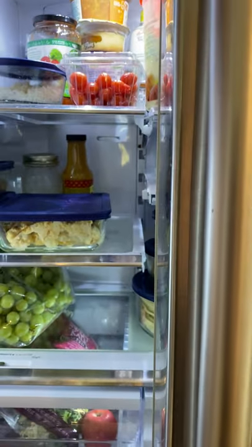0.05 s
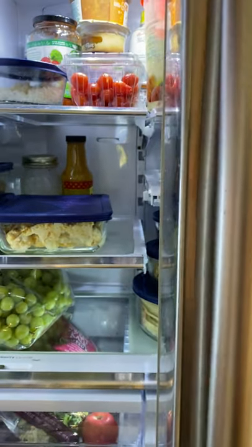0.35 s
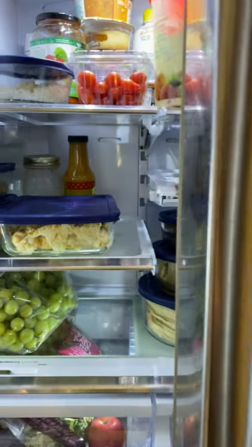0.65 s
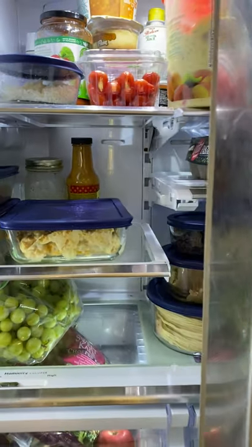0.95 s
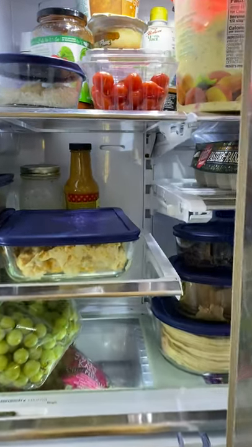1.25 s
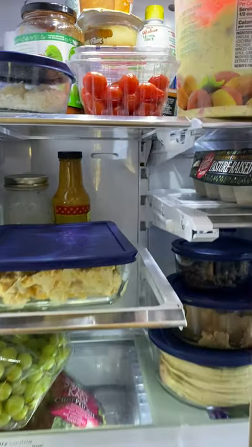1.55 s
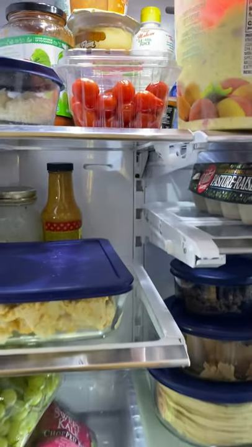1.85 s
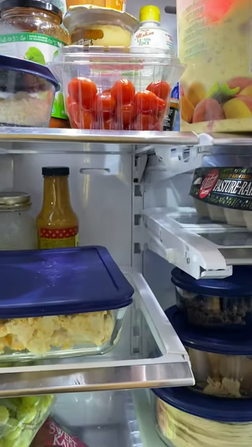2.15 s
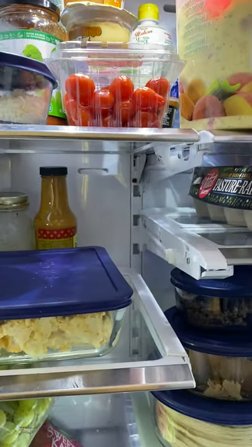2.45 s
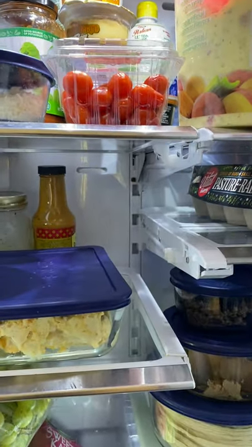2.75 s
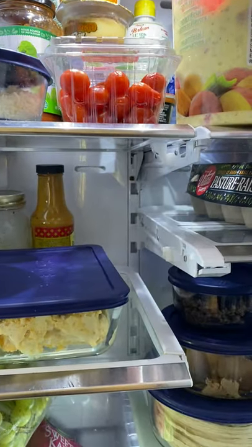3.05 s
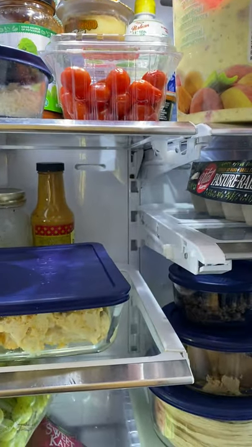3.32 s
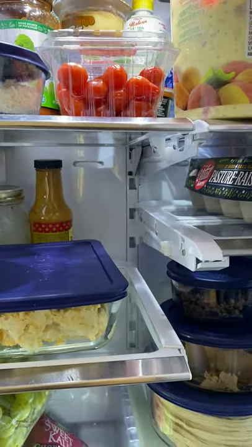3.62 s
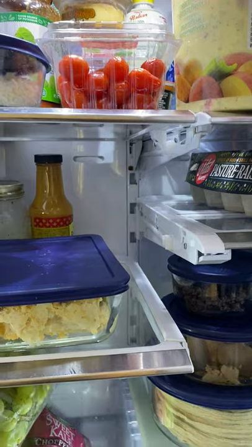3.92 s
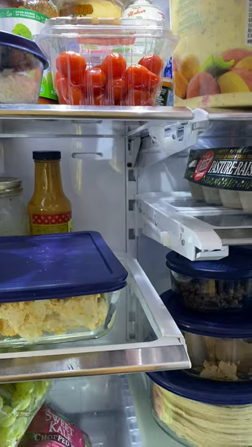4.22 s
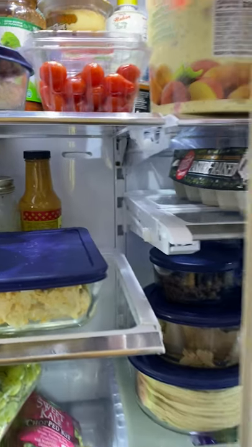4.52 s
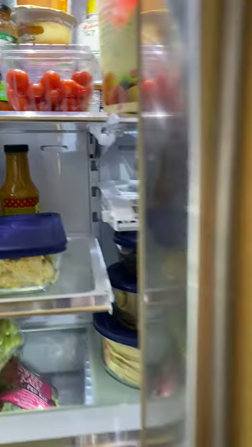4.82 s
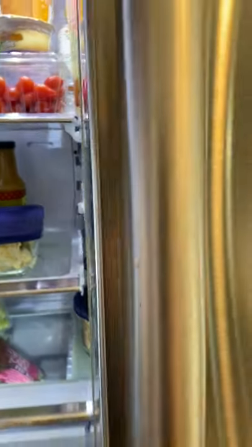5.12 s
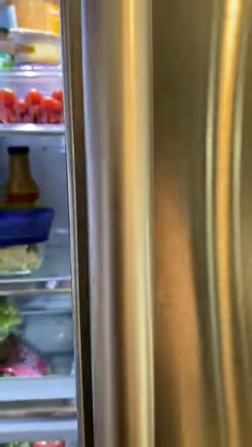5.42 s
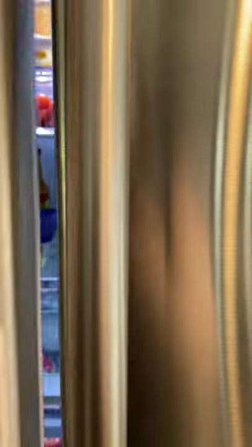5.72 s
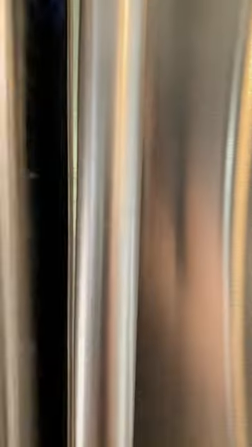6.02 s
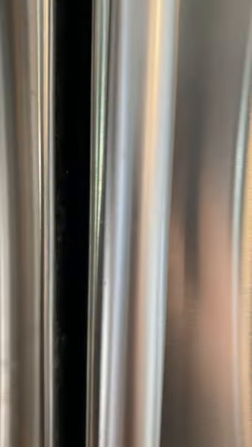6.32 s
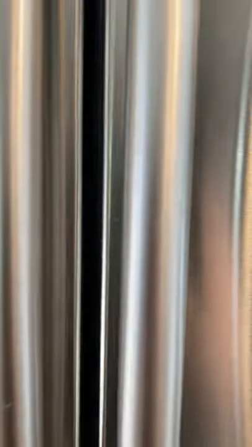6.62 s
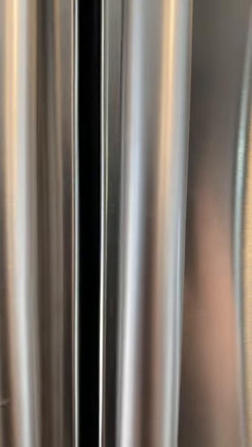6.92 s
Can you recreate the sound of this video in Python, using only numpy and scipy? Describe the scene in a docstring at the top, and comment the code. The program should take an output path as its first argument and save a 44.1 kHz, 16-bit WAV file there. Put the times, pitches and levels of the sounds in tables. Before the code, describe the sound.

A refrigerator door creaks open ever more slowly over a low hum, then knocks, rattles and shuts with a heavy thump.

```python
"""A refrigerator door swings open on a dry hinge that sticks and slips, ever slower, until it stops.
All along, the compressor and fans hum out of the open cabinet. A sleeve rustles and faint whirs come
and go. After about 4.4 seconds the door is pushed back with soft bumps and knocks. Near 6 seconds its
flap clacks into the guide and jars rattle. At 6.6 seconds it lands on the gasket (the rubber seal)
with a thump that shakes the shelves."""
import sys
import numpy as np
from scipy import signal
from scipy.fft import rfft, irfft, next_fast_len
from scipy.io import wavfile

SR = 44100
rng = np.random.default_rng(int(sys.argv[2]) if len(sys.argv) > 2 else 0)


def pcm_store(signal):
    """Save signal as 16-bit PCM."""
    levels = np.round(np.clip(np.atleast_2d(signal), -1, 1) * 32767)
    wavfile.write(sys.argv[1], SR, levels.astype(np.int16).T)


N = 311346
TIME = np.arange(N) / SR


def from_db(db):
    """Turn decibels into a gain."""
    return 10 ** (np.asarray(db) / 20)


def rms_one(x):
    """Scale a signal to an average (rms) size of 1."""
    return x / np.sqrt(np.mean(x ** 2) + 1e-20)


def read(curve, times):
    """A curve's values at the given times."""
    return np.interp(times, *np.transpose(curve))


def at_hz(points, hz):
    """A table's value at a pitch, with every octave equally wide."""
    f, value = np.transpose(points)
    return np.interp(np.log(hz), np.log(f), value)


def follow(law, control):
    """A level in dB that changes in a straight line with a control."""
    base_db, slope_db = law
    return base_db + slope_db * control


def pan(db):
    """Left and right gains, with the left louder by db."""
    return from_db(np.array([[db], [-db]]) / 2)


def drift(rate):
    """A random wobble of size about 1 that takes `rate` new values a second."""
    knots = rng.standard_normal(8000)
    return np.interp(TIME * rate, np.arange(len(knots)), knots)


def strikes(times, levels_db):
    """One click of the given level at each time."""
    out = np.zeros(N)
    out[np.round(np.asarray(times) * SR).astype(int)] = from_db(levels_db)
    return out


def dull(x, edge_hz, order):
    """Turn down the treble above an edge."""
    return signal.sosfilt(signal.butter(order, edge_hz, fs=SR, output="sos"), x)


def through(x, response):
    """Give every sample of x the ring of a stereo response."""
    return signal.fftconvolve(np.atleast_2d(x), response, axes=1)[:, :N]


def reflections(x, wet_db, t60):
    """Add dense echoes. Here and below, t60 is the fade time: the seconds it takes to fall by 60 dB."""
    t = TIME[:SR // 2]
    echoes = rng.standard_normal((2, len(t))) * from_db(-60 * t / t60)
    return x + from_db(wet_db) * through(x, echoes / np.sqrt(np.sum(echoes[0] ** 2)))


# Where each pitch sits. Each row: pitch in Hz, dB by which left is louder than right.
LEAN = [(60, -0.5), (200, -3), (550, -5.5), (950, 5.5), (1300, 1.5), (2300, -0.5)]
def ring(x, modes, swell_s):
    """A struck object rings with its own tones (modes), which build up and then fade."""
    t = TIME[:SR]
    tones = sum(pan(at_hz(LEAN, hz)) * from_db(db - 60 * t / t60) * np.sin(2 * np.pi * hz * t)
                for hz, db, t60 in modes)
    return through(x, tones * (1 - np.exp(-t / swell_s)))


# How wide each pitch sounds. Each row: pitch in Hz, dB of the side signal over the middle one.
WIDTH = [(60, -40), (200, -19), (370, -4), (670, -1.5), (1230, -6.5), (2260, -4.5), (5000, 4.5),
         (10000, -12.5)]
def noise(spectrum, size=N, t60=None, patchy_db=None):
    """Stereo noise that starts at size 1; each half-octave band may waver or fade at its own rate."""
    steady, out = 0, 0
    edges = 27 * 2 ** np.arange(0, 9.6, .5)
    white = rng.standard_normal((2, 2, size + 4000))
    for k, (low, high) in enumerate(zip(edges, edges[1:])):
        hz = np.sqrt(low * high)
        band_filter = signal.butter(2, [low, high], "band", fs=SR, output="sos")
        mid, side = signal.sosfilt(band_filter, white[k % 2])[:, -size:]
        band = (mid + from_db(at_hz(WIDTH, hz)) * side * [[1], [-1]]) * pan(at_hz(LEAN, hz))
        band = rms_one(band) * np.sqrt(high - low) * from_db(at_hz(spectrum, hz))
        if patchy_db is not None:
            band = band * from_db(patchy_db * drift(12))
        steady = steady + band
        out = out + (band if t60 is None else band * from_db(-60 * TIME[:size] / at_hz(t60, hz)))
    return out / np.sqrt(np.mean(steady ** 2))


# The door coasting to a stop. Each row: time in seconds, hinge slips per second.
SWING_SPEED = [(0, 18.45), (.3, 16.94), (.45, 15.36), (.65, 14.36), (1.2, 11.1), (1.8, 8.09), (2.5, 5.05),
               (3.25, 2.05)]
MID_SPEED = 10   # slips per second
# The grip: the force that a slip lets go. Each row: time in seconds, level in dB.
GRIP = [(0, -41.5), (.33, -40), (.6, -37.5), (1.3, -36), (1.6, -34.5), (2.05, -29.5), (2.3, -36.5),
        (2.9, -38), (3.25, -40)]
def hinge(first_slip_s=.0377):
    """The dry hinge slips each time the door turns one more equal step; every slip shakes the door."""
    t = TIME[TIME < SWING_SPEED[-1][0]]
    steps = np.cumsum(read(SWING_SPEED, t)) / SR
    steps -= np.interp(first_slip_s, t, steps)
    times = np.interp(np.arange(int(steps[-1]) + 1), steps, t)
    slips = times, read(SWING_SPEED, times), read(GRIP, times)
    return pin_rasp(*slips) + shudder(*slips) + bracket(*slips) + panel_and_shelf(*slips)


def slip_noise(times, levels_db, creep_share, creep_db, fall_s):
    """Friction creeps before each slip, longer when the door is slow, then lets go in a short burst."""
    envelope = np.zeros(N)
    for at, db, period in zip(times, levels_db, np.gradient(times)):
        creep_s = creep_share * period
        span = slice(max(int((at - creep_s) * SR), 0), int((at + 10 * fall_s) * SR))
        t = TIME[span] - at
        burst = np.exp(-np.maximum(t, 0) / fall_s)
        envelope[span] += from_db(db) * np.where(t < 0, from_db(creep_db), burst)
    return envelope * rng.standard_normal((2, N))


def resonate(x, peaks, uneven_db=1):
    """The pin's resonances colour the noise; each answers unevenly, and some grow with the speed."""
    out, power = 0, 0
    faster = read(SWING_SPEED, TIME) - MID_SPEED
    for k, (hz, width_hz, db, *speed_db) in enumerate(peaks):
        drive = x * from_db(sum(speed_db) * faster + uneven_db * drift(12))
        r = np.exp(-np.pi * width_hz / SR)   # share of the ring left after one sample
        feedback = [1, -2 * r * np.cos(2 * np.pi * hz / SR), r * r]
        mid, side = signal.lfilter(np.array([1, 0, -1]) * (1 - r * r) / 2, feedback, drive + 1e-18)
        spread = from_db(at_hz(WIDTH, hz))
        stereo = (mid + spread * side * [[1], [-1]]) / np.hypot(1, spread)
        out = out + (-1) ** k * from_db(db) * stereo
        power += from_db(db) ** 2 * np.pi * width_hz / SR
    return out / np.sqrt(power)


# The pin's groan and rub. Each row: pitch in Hz, width in Hz, relative level in dB.
PIN_GROAN = [(583, 876, 4.5), (1071, 640, 3.5)]
PIN_RUB = [(1380, 100, -9), (1770, 120, 1), (1950, 90, 0), (2150, 110, -5), (3050, 600, -7)]
# Its bright snap. Each row: the same three, then dB added per slip per second above MID_SPEED.
PIN_SNAP = [(5075, 520, 1, 0.5), (5720, 650, -5.5, 0.68), (6320, 380, -3.5, 1), (7240, 154, 2, 0.1),
            (7890, 150, 4, 0.38), (10300, 2200, -15, 0)]
# Each speed law: dB over the grip at rest, dB added per slip per second.
GROAN_LAW = (-8.5, 0.3)
RUB_LAW = (-21.5, 1)
# How strong the snap is. Each row: time in seconds, level in dB.
SNAP_DB = [(0, -40), (.55, -40), (1.2, -48), (1.8, -39), (2.3, -49.5), (3.25, -55)]
def pin_rasp(times, speed, grip_db, uneven_db=-1.86):
    """Each slip sounds in the hinge pin with a bright snap; a slow door groans, a fast one rubs more."""
    snap_db = read(SNAP_DB, times) + uneven_db * rng.standard_normal(len(times))
    groan_db = grip_db + follow(GROAN_LAW, speed)
    rub_db = grip_db + follow(RUB_LAW, speed)
    groan = resonate(slip_noise(times, groan_db, creep_share=.073, creep_db=-3, fall_s=.024), PIN_GROAN)
    rub = resonate(slip_noise(times, rub_db, creep_share=.08, creep_db=-10, fall_s=.0099), PIN_RUB)
    snap = resonate(slip_noise(times, snap_db, creep_share=.092, creep_db=-19, fall_s=.0027), PIN_SNAP)
    low = dull(groan + rub, edge_hz=4200, order=2)
    high = dull(snap, edge_hz=11500, order=2)
    in_kitchen = reflections(low, wet_db=-15.5, t60=0.88)
    in_hollow_door = reflections(high, wet_db=-4.0, t60=0.08)
    return in_kitchen + in_hollow_door


# The door's shuddering tones. Each row: pitch in Hz, relative level in dB, fade time in seconds.
SHUDDER_MODES = [(253, 2.5, 0.073), (203.3, -2.5, 0.15), (279.4, -6, 0.053)]
# Their speed law: dB over the grip at rest, dB added per slip per second.
SHUDDER_LAW = (3.83, -0.32)
def shudder(times, speeds, grip_db, lead_share=0.036, hold_s=0.0059, hold_share=0.053, swell_s=0.008):
    """The door shakes roughly while a slip lasts, longer when it is slow, and then rings out."""
    out, t = np.zeros(N), TIME[:SR // 4]
    levels_db = grip_db + follow(SHUDDER_LAW, speeds)
    for hz, mode_db, t60 in SHUDDER_MODES:
        chances = rng.uniform(-1.38, 1, (len(times), 2))
        for at, speed, db, (detune, phase) in zip(times, speeds, levels_db, chances):
            lead_s = lead_share / speed
            since_release = np.maximum(t - lead_s - hold_s - hold_share / speed, 0)
            swell = 1 - np.exp(-t / (swell_s * MID_SPEED / speed))
            fade = from_db(db + mode_db - 60 * since_release / t60)
            tone = np.sin(2 * np.pi * hz * (1 + .025 * detune) * (t - lead_s) + phase)
            start = max(round((at - lead_s) * SR), 0)
            out[start:start + len(t)] += swell * fade * tone
    return out * from_db(1.5 * drift(110)) * pan(at_hz(LEAN, SHUDDER_MODES[0][0]))


# The hinge bracket's woody tones. Each row: pitch in Hz, relative level in dB, fade time in seconds.
BRACKET_MODES = [(1143, -14.5, 0.064), (1763, -13, 0.041), (1972, -22.5, 0.081)]
def bracket(times, speed, grip_db, uneven_db=2, let_go_s=0.0036, let_go_share=0.04):
    """Each slip knocks the bracket twice, and each tone answers with a strength of its own."""
    let_go = times - let_go_s - let_go_share / speed   # earlier when the door is slow
    out = 0
    for mode in BRACKET_MODES:
        jolt_db = grip_db + uneven_db * rng.standard_normal(len(times))
        jolts = strikes(let_go, jolt_db - 4.5) + strikes(times, jolt_db)
        out = out + ring(jolts, [mode], swell_s=0.00033)
    return out


# Tones of the door panel and a shelf. Each row: pitch in Hz, relative level in dB, fade time in seconds.
PANEL_MODES = [(189.9, 2.5, 0.21), (388, -12.5, 0.15), (550.3, -11, 0.17)]
SHELF_MODES = [(952.7, 1.5, 0.13)]
# The panel's speed law: dB over the grip at rest, dB added per slip per second.
PANEL_LAW = (-18, 1.444)
# How hard the shelf is shaken. Each row: time in seconds, relative level in dB.
SHELF_DB = [(0, -48.5), (.26, -42.5), (.39, -51.5), (.6, -51.5), (.79, -42), (.93, -51.5), (1.4, -40.5),
            (1.8, -46), (1.97, -52), (3.25, -58)]
def panel_and_shelf(times, speed, grip_db):
    """The panel and a shelf ring on after each slip; a fast door shakes its panel more."""
    under_way = strikes([0], [-35.5])   # the door is already creaking at the start
    panel_jolts = under_way + strikes(times, grip_db + follow(PANEL_LAW, speed))
    shelf_jolts = under_way / 2 + strikes(times + 0.00249, read(SHELF_DB, times) + 8.5)
    return ring(panel_jolts, PANEL_MODES, swell_s=.0023) + ring(shelf_jolts, SHELF_MODES, swell_s=.0076)


# Tones of the compressor and fans. Each row: pitch in Hz, base level in dB.
HUM = [(49.3, -53), (64.3, -57), (98.6, -55.5), (136.3, -63.5)]
# How much of the hum gets out. Each row: time in seconds, dB added.
OPENING = [(0, -5.5), (1.8, 3.5), (4.4, 1), (5.1, -3.5), (7.06, -5)]
# The colour of the rushing air. Each row: pitch in Hz, relative level in dB.
AIR = [(30, -28.5), (59, -14), (250, -17), (600, -33.5), (1100, -36.5), (3200, -50.5), (6300, -53.5),
       (14300, -69)]
def compressor_and_fans(waver_rad=0.08, air_db=-60):
    """Compressor and fans beat against each other over a soft rush of air."""
    hum = 0
    for hz, db in HUM:
        phase = 2 * np.pi * (hz * TIME + rng.random()) + waver_rad * drift(20)
        hum = hum + from_db(db) * np.sqrt(2) * np.sin(phase)
    return hum * from_db(read(OPENING, TIME)) * pan(-1.1) + from_db(air_db) * noise(AIR)


def blow(spectrum, rise_s, t60, tail_db, tail_t60):
    """One hit: the contact builds up, rings densely and briefly, and leaves a weak tail in the kitchen."""
    t = TIME[:SR // 2]
    contact = (1 - np.exp(-t / rise_s)) ** 2
    fade = from_db(-60 * t / t60) + from_db(tail_db - 60 * t / tail_t60)
    return noise(spectrum, size=len(t)) * contact * fade


# Knocks of the door, its flap and its load. Each row: start in seconds, thud strength in dB,
# hardness from 0 to 1, pitch of the hollow tone in Hz, that tone's dB over the thud strength.
KNOCKS = [(0.621, -46, 0.1, 358, 8.5), (4.45, -41.5, 0.43, 1650, 0), (4.457, -50, 0.4, 308, 18),
          (4.802, -45, 0, 549, 5.5), (4.937, -49, 0.49, 390, 6.5), (5.62, -38.5, 0.61, 382, 3.5),
          (5.914, -53, 0.26, 414, 10.5), (6.0716, -44.5, 0.9, 1780, 24.5), (6.104, -48, 0.1, 189, 17.5),
          (6.1444, -38.5, 0.78, 2080, 18.5), (6.231, -32.5, 0.37, 414, -5), (6.247, -37.5, 0.1, 125.3, 6.5),
          (6.559, -54.5, 0.95, 2460, 20), (6.5972, -32.5, 0.87, 3400, 12)]
# The colours of a knock's three parts. Each row: pitch in Hz, relative level in dB.
THUD = [(50, -9.5), (280, -5.5), (500, -10), (900, -40.5), (5000, -100)]
CLACK = [(150, -3), (600, 7.5), (1100, -4.5), (1800, 4.5), (2800, -28.5), (14000, -77.5)]
CLICK = [(1000, -48.5), (2200, -0.5), (5000, 1.5), (12000, -23), (16000, -40)]
# Each hardness law: dB over the thud when soft, dB added when fully hard.
CLACK_LAW = (-21, 39.9)
CLICK_LAW = (-69.5, 94)
def knocks(hollow_cycles=36):
    """Plastic parts meet with a thud and a hollow tone; a harder contact adds more clack and click."""
    times, thud_db, hardness, *_ = np.transpose(KNOCKS)
    thuds = strikes(times, thud_db)
    clicks = strikes(times, thud_db + follow(CLICK_LAW, hardness))
    clacks = strikes(times, thud_db + follow(CLACK_LAW, hardness))
    out = through(thuds, blow(THUD, rise_s=0.0018, t60=0.13, tail_db=-11.0, tail_t60=0.41))
    out += through(clicks, blow(CLICK, rise_s=.0001, t60=0.037, tail_db=-19.5, tail_t60=0.33))
    out += through(clacks, blow(CLACK, rise_s=0.00059, t60=0.055, tail_db=-24.5, tail_t60=1.0))
    for at, db, _, hz, hollow_db in KNOCKS:
        cycles, start = hz * TIME[:SR // 5], round(at * SR)
        envelope = (1 - np.exp(-cycles / 2)) * from_db(db + hollow_db - 60 * cycles / hollow_cycles)
        out[:, start:start + len(cycles)] += envelope * np.sin(2 * np.pi * cycles)
    return out


# Strokes of the sleeve. Each row: loudest moment in seconds, level in dB, swell and fade in seconds.
SWISHES = [(1.05, -68, .5, 0.14), (4.88, -65, 0.098, 0.079), (1.46, -64, 0.045, 0.045),
           (5.025, -56, 0.012, 0.05), (5.335, -52, 0.093, 0.076), (6.11, -58, 0.14, 0.033),
           (6.57, -53.5, 0.099, 0.056)]
# The colour of the cloth. Each row: pitch in Hz, relative level in dB.
SLEEVE = [(600, -43), (1200, -14), (2600, -1), (6000, -3.5), (12000, -6.5)]
def sleeve(patchy_db=4.5, grit_db=2.0):
    """Cloth swells and fades with each move of the arm, gritty and shifting in colour."""
    strokes = sum(from_db(db) * np.exp(-np.maximum((at - TIME) / swell_s, (TIME - at) / fade_s))
                  for at, db, swell_s, fade_s in SWISHES)
    cloth = noise(SLEEVE, patchy_db=patchy_db) * from_db(grit_db * drift(620))
    return dull(cloth, edge_hz=12500, order=10) * strokes


# Faint whirs and scrapes. Each row: middle and length in seconds, pitch in Hz, level in dB,
# half width in Hz.
WHIRS = [(2.518, 1.7, 3940, -83, 151), (3.015, 0.3, 1450, -76, 49.4), (3.58, 0.3, 1950, -76.5, 398),
         (4.07, 0.36, 1090, -72.5, 188), (4.437, 0.17, 1070, -68, 235), (5.782, 0.66, 4800, -71, 980)]
def whirs(waver_db=4.0):
    """Narrow bands of noise swell, waver and fade."""
    out = 0
    for middle, length, hz, db, half_width in WHIRS:
        swell = np.cos(np.pi * np.clip((TIME - middle) / length, -.5, .5))
        level = from_db(db + waver_db * drift(25))
        band = signal.butter(2, [hz - half_width, hz + half_width], "band", fs=SR, output="sos")
        out = out + level * swell * rms_one(signal.sosfilt(band, rng.standard_normal((2, N))))
    return out


# Soft pushes on the door. Each row: start in seconds, strength in dB.
BUMPS = [(4.431, -41), (4.453, -39), (4.8, -43.5)]
# The whole door's deep tones. Each row: pitch in Hz, relative level in dB, fade time in seconds.
BUMP_MODES = [(59.4, 7.5, 0.26), (113, 0, 0.12)]
def bumps():
    """A push sets the whole door thudding softly."""
    return ring(strikes(*np.transpose(BUMPS)), BUMP_MODES, swell_s=0.0019)


# Light plastic ticks. Each row: start in seconds, strength in dB.
TICKS = [(4.733, -55.5), (5.989, -51.5), (6.133, -44), (6.234, -49.5), (6.432, -53), (6.767, -41.5)]
# Their colour. Each row: pitch in Hz, relative level in dB.
TICK_COLOUR = [(1000, -35.5), (2200, 4), (9000, -9)]
def ticks():
    """A light touch of plastic makes only a thin click."""
    tick = blow(TICK_COLOUR, rise_s=0.00013, t60=0.049, tail_db=-13.5, tail_t60=0.2)
    return through(strikes(*np.transpose(TICKS)), tick)


# Flap and gasket sliding home. Each row: time in seconds, level in dB.
SLIDE_DB = [(6.05, -110), (6.1, -41.5), (6.28, -42), (6.49, -51), (6.59, -29.5), (6.7, -89)]
# The colour of the scrape. Each row: pitch in Hz, relative level in dB.
SLIDE = [(30, -7), (160, -12.5), (350, -25), (1500, -31), (4800, -51.5), (13000, -56)]
def gasket_slide(grit_db=3):
    """Flap and gasket scrape unevenly along the frame."""
    return noise(SLIDE) * from_db(read(SLIDE_DB, TIME)) * from_db(grit_db * drift(120))


# Jars and packets touching. Each row: start in seconds, level in dB.
RATTLES = [(6.082, -33), (6.146, -27.5), (6.232, -37), (6.277, -35.5), (6.365, -42.5), (6.473, -42.5),
           (6.521, -44), (6.668, -23.5), (6.714, -32.5)]
def rattles(centre_hz=1300, t60=0.04, spread_octaves=0.7, count=9):
    """Jars and packets jostle in the door bins: each touch rings its own short cluster of tones."""
    out, t = np.zeros((2, N)), TIME[:SR // 8]
    for at, db in RATTLES:
        offsets = np.linspace(-1, 1, count) + rng.uniform(-0.72, 1, count) / count
        pitches = centre_hz * 2 ** (spread_octaves * offsets)
        tones = sum(pan(at_hz(LEAN, hz)) * np.sin(2 * np.pi * (hz * t + rng.random())) for hz in pitches)
        envelope = from_db(db - 60 * t / t60) * (1 - np.exp(-centre_hz * t))
        start = round(at * SR)
        out[:, start:start + len(t)] += envelope * tones / np.sqrt(count)
    return out


# Colours of the latch meeting the frame, and of shelves and walls shaking.
# Each row: pitch in Hz, relative level in dB.
CRACK = [(500, -17), (1000, 8), (1600, -8.5), (3300, -2.5), (5500, -15.5), (9000, 2), (14500, -10.5)]
SHAKE = [(40, -22), (100, -2.5), (400, -7), (1000, -11), (2800, -26), (6200, -32.5), (10000, -31),
         (16000, -50)]
# How long the shaking lasts. Each row: pitch in Hz, fade time in seconds.
SHAKE_T60 = [(100, 0.89), (1000, 0.54), (6000, 0.68), (12000, 0.23)]
# Tones of the jars and the cabinet. Each row: pitch in Hz, relative level in dB, fade time in seconds.
JAR_MODES = [(148.8, 8.9, 0.75), (248, 10, 0.45), (337, 10.5, 0.4), (450, 6.9, 0.45), (553, 4.1, 0.37),
             (842, 9, 0.43), (1028, 4.9, 0.31), (1238, 10, 0.26), (1480, 7, 0.29)]
CABINET_MODES = [(35.64, -9, 0.56), (75, -0.5, 0.16), (89, -2, 0.11), (162, -6, 0.051)]
def slam(land_s=6.6002, boom_s=6.6125, waver_db=3.5):
    """The door lands with a crack: shelves shake, jars ring, the cabinet booms as the gasket squeezes."""
    latch = blow(CRACK, rise_s=.0001, t60=0.013, tail_db=-19.5, tail_t60=0.095)
    crack = through(strikes([land_s], [-5]), latch)
    shake = through(strikes([land_s], [-22.5]), noise(SHAKE, size=SR, t60=SHAKE_T60))
    shake = dull(shake * from_db(waver_db * drift(60)), edge_hz=10800, order=8)
    jars = ring(strikes([land_s], [-36]), JAR_MODES, swell_s=0.0034)
    boom = ring(strikes([boom_s], [-8]), CABINET_MODES, swell_s=0.00052)
    return crack + shake + jars + boom


def scene():
    """Everything heard from just in front of the cabinet."""
    door = hinge() + knocks() + bumps() + ticks() + rattles() + slam()
    rubbing = sleeve() + gasket_slide()
    return door + rubbing + compressor_and_fans() + whirs()


def record(dry, right_lag_s=3.6e-5, cutoff_hz=14200):
    """Two microphones, slightly apart, drop the deepest bass, round the peaks and cut the top."""
    size = next_fast_len(N + SR)
    hz = np.arange(size // 2 + 1) * SR / size
    delay = np.exp(-2j * np.pi * hz * right_lag_s)
    right = irfft(rfft(dry[1], size) * delay, size)[:N]
    trimmed = signal.sosfilt(signal.butter(2, 28, "high", fs=SR, output="sos"), [dry[0], right])
    rounded = .8 * np.tanh(trimmed / .8)
    return signal.sosfilt(signal.ellip(8, .2, 70, cutoff_hz, fs=SR, output="sos"), rounded)


dry = scene()
out = record(dry)
pcm_store(out)
```